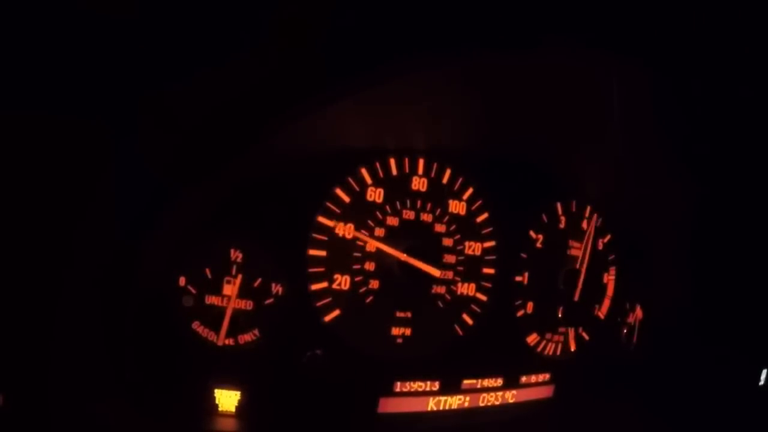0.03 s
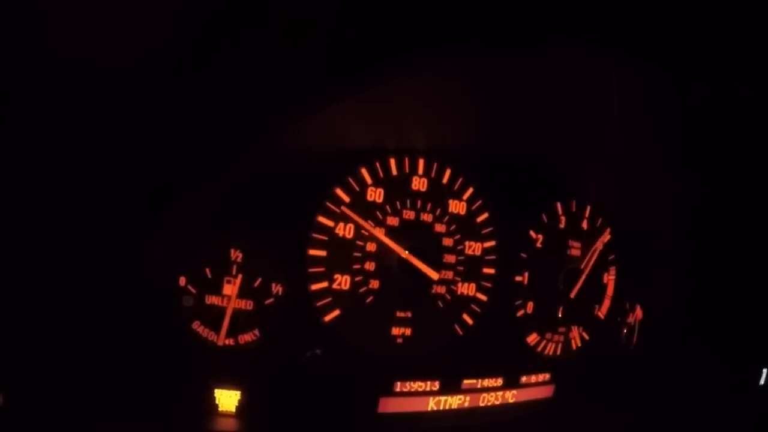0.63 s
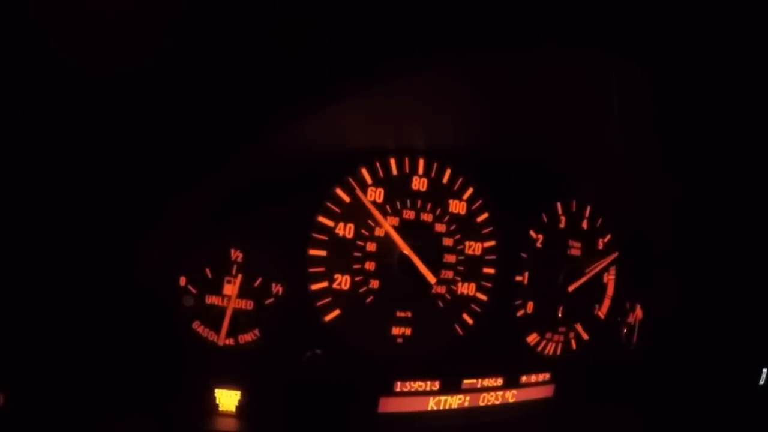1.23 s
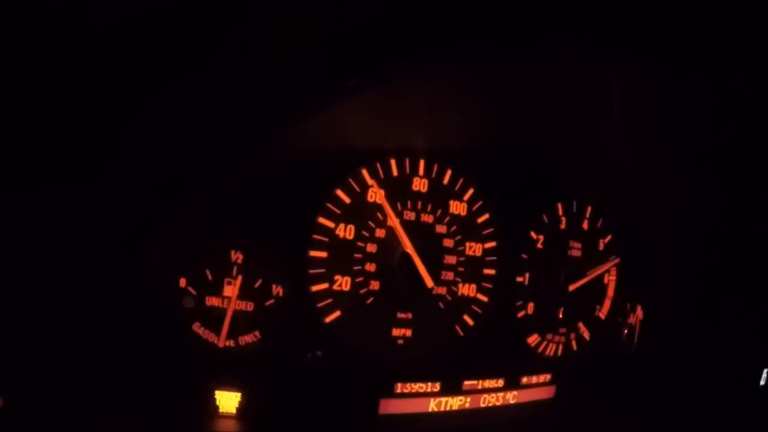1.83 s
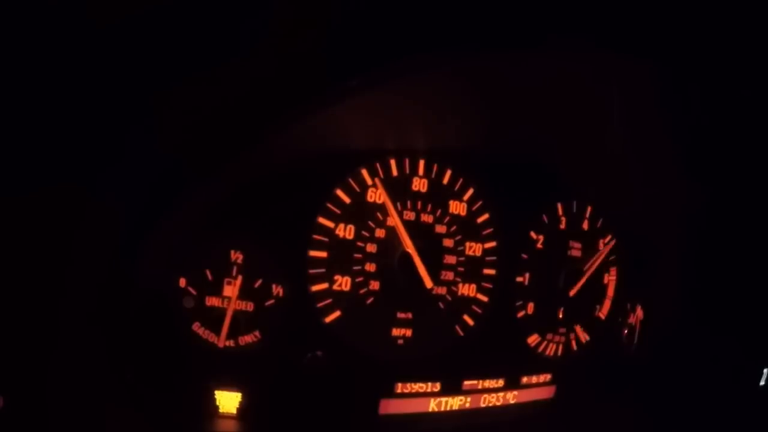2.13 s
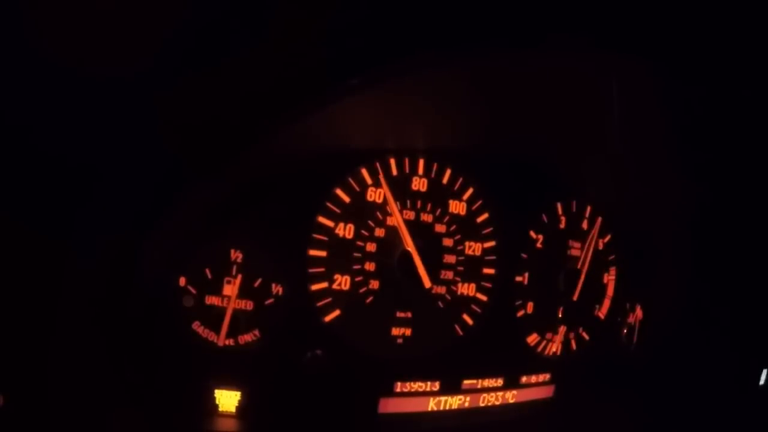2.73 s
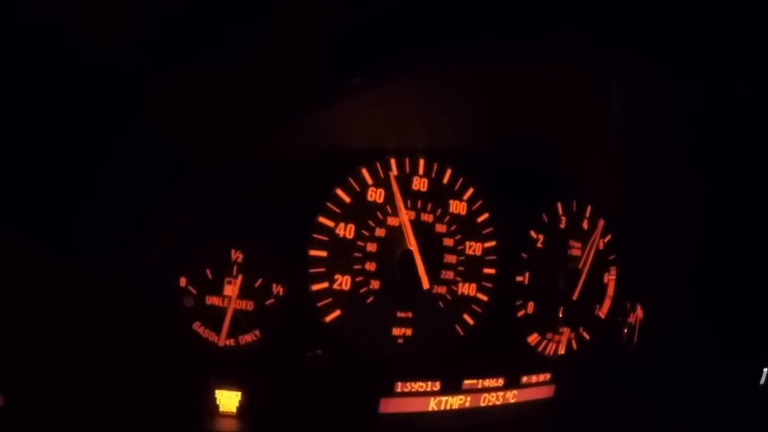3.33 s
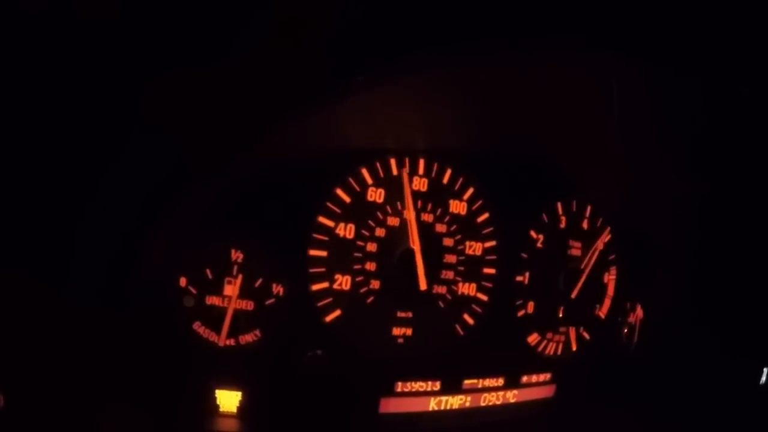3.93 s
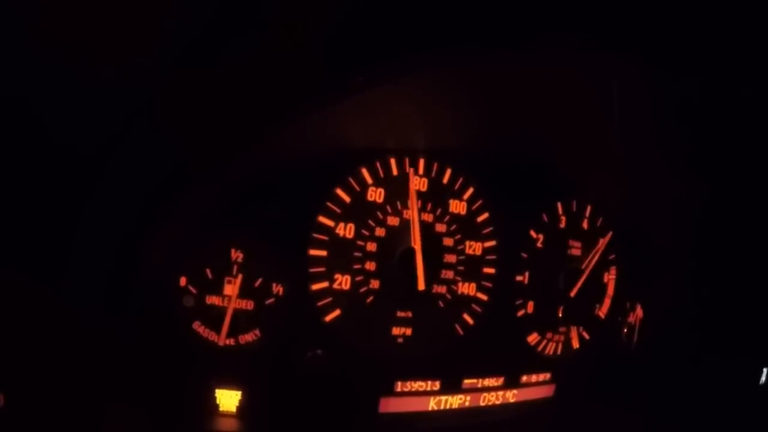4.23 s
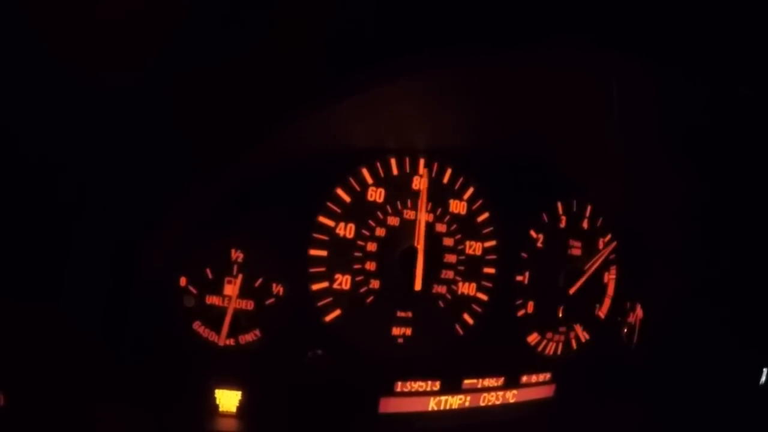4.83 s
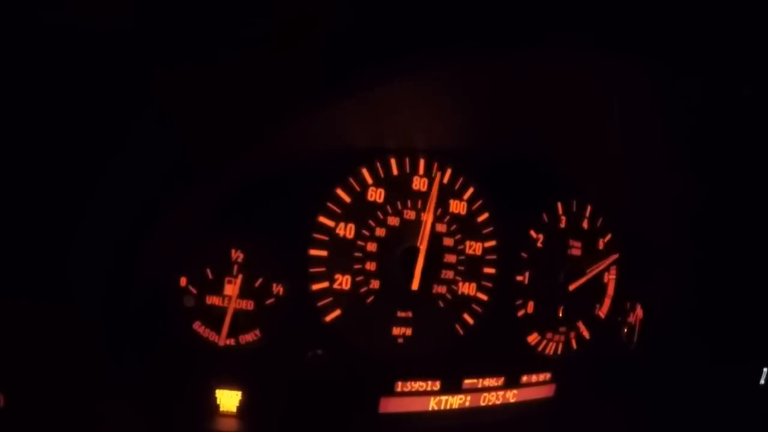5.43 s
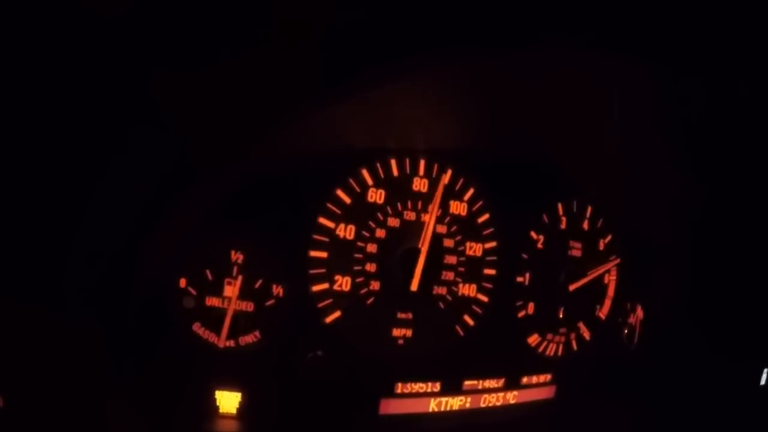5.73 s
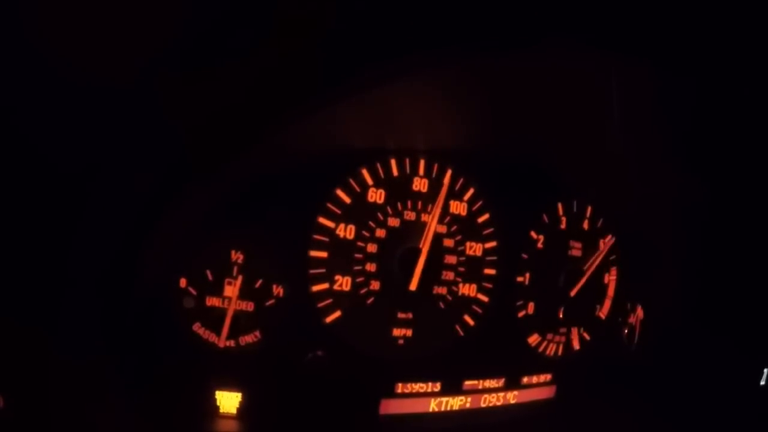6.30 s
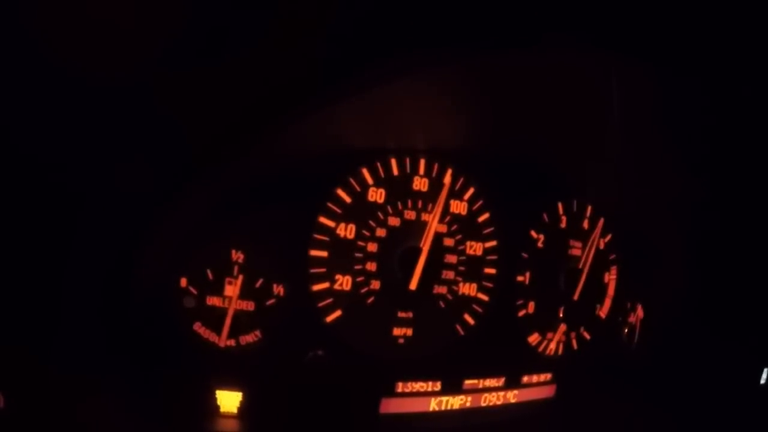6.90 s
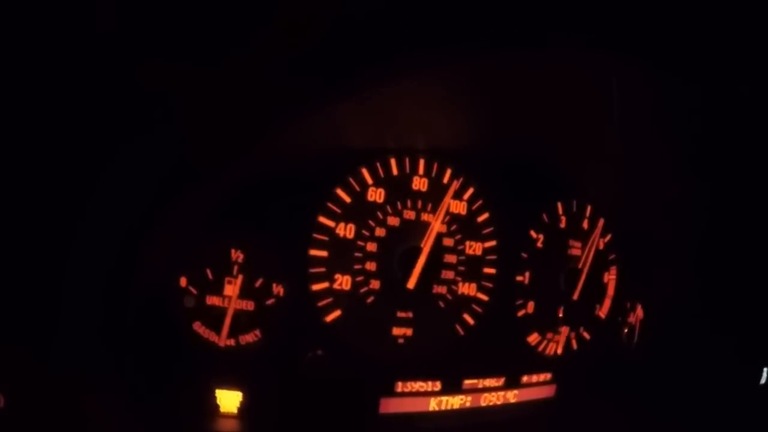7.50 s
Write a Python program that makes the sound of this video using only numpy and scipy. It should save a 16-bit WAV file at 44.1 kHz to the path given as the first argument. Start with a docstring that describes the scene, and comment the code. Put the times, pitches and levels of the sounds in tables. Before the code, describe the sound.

A supercharged V8 car engine is heard from the driver's seat, already accelerating hard. Its deep, booming roar rises in pitch, with an exhaust rasp and a faint intake hiss and whistle on top. At about 1.6 seconds the throttle shuts with a dull thud, and the engine goes quieter and falls in pitch for an upshift. Around 2.5 seconds another thud and small clack bring the power back, and the roar climbs slowly for three seconds. At about 5.7 seconds a knock marks a second, gentler shift and the revs sink again. From 6.7 seconds the engine pulls at half throttle, rising slightly until the end at about 7.5 seconds. Low tyre rumble and a deep cabin throb run throughout, while wind noise grows with speed. Loose dashboard trim ticks faintly, mostly after 5 seconds.

```python
"""Supercharged V8 from the driver's seat.

A hard pull through two upshifts. Crank orders boom in the cabin, firings chop the exhaust roar and rasp,
and the blower's intake hisses and whistles under load. Tyre rumble and wind follow road speed.
The cabin air throbs, trim ticks over bumps, and the driveline knocks as the load comes and goes."""
import sys
import numpy as np
from scipy import signal
from scipy.fft import rfft, irfft
from scipy.io import wavfile
from scipy.ndimage import uniform_filter1d

SR = 44100
rng = np.random.default_rng(int(sys.argv[2]) if len(sys.argv) > 2 else 0)


def store_pcm(level_fs):
    """Save levels as 16-bit WAV."""
    pcm = np.round(np.clip(level_fs, -1, 1) * 32767).astype(np.int16)
    wavfile.write(sys.argv[1], SR, np.atleast_2d(pcm).T)


N = 333396
TIME_S = np.arange(N) / SR
BINS_HZ = np.maximum(np.arange(N // 2 + 1) * SR / N, 1)


def undb(db):
    """Decibels to gain."""
    return 10 ** (np.asarray(db) / 20)


def unit(x):
    """Scale to rms 1."""
    return x / np.sqrt(np.mean(x ** 2))


def curve(points):
    """(time [s], value) points interpolated to every sample."""
    return np.interp(TIME_S, *np.transpose(points))


def noise():
    """White noise."""
    return rng.standard_normal(N)


def walk(rate_hz):
    """Smoothed random steps; rms 1."""
    hold = max(int(SR / rate_hz), 1)
    steps = np.repeat(rng.standard_normal(N // hold + 2), hold)[rng.integers(hold):][:N]
    return unit(uniform_filter1d(uniform_filter1d(steps, hold), hold))


def colour(x, points):
    """Filter by (frequency [Hz], gain [dB]) points; rms 1."""
    hz, db = np.transpose(points)
    gain = undb(np.interp(np.log(BINS_HZ), np.log(hz), db))
    return unit(irfft(rfft(x) * gain, N))


def resonate(x, hz, width_hz):
    """Two passes through one resonance; rms 1."""
    response = 1 / (1 + 1j * (BINS_HZ / hz - hz / BINS_HZ) * hz / width_hz)
    return unit(irfft(rfft(x) * response ** 2, N))


def above(x, corner_hz):
    """Zero-phase high-pass."""
    return irfft(rfft(x) / (1 + (corner_hz / BINS_HZ) ** 4), N)


def swell(hz, centre_hz, width_hz):
    """Gain of a resonance for a tone gliding through it."""
    return 1 / (1 + (2 * (hz - centre_hz) / width_hz) ** 2)


def fade(start_s, decay_s):
    """Sudden onset, exponential decay."""
    return (TIME_S > start_s) * np.exp(-np.clip((TIME_S - start_s) / decay_s, 0, 20))


def effort(shut, crank_hz, shut_loss_db, db_per_hz):
    """Gain that falls as the throttle shuts and climbs with revs; 1 flat out at 40 turns a second."""
    return undb(db_per_hz * (crank_hz - 40) - shut_loss_db * shut)


def puffs(turns, depth, lope):
    """Gas noise swelling at four firings a turn; uneven banks make it lope once a turn."""
    angle = 2 * np.pi * turns
    return noise() * np.exp(depth * np.cos(4 * angle) + lope * np.cos(angle))


def crank_tone(turns, order, waver_db, smear_rad):
    """One crank order; uneven combustion shakes its level and phase."""
    phase = 2 * np.pi * (order * turns + rng.random()) + smear_rad * walk(22)
    return np.sqrt(2) * undb(waver_db * walk(11)) * np.sin(phase)


def exhaust_rasp(turns, crank_hz, shut):
    """Bright gas noise, lightly chopped by the firings."""
    spectrum = [(700, -33), (1200, 5.5), (1700, 4), (2200, -1), (2650, 3.5), (3050, 5.5), (3500, -5.5),
                (4050, 3.5), (4500, -6), (5100, -0.5), (5700, -7.5), (6600, -5), (7600, -17), (12000, -26)]  # (frequency [Hz], gain [dB])
    rasp = colour(puffs(turns, depth=0.061, lope=0.052), spectrum) * undb(-39.5 + 0.5 * walk(45))
    return rasp * effort(shut, crank_hz, shut_loss_db=8, db_per_hz=0.52)


def cabin_boom(turns, crank_hz, shut):
    """Strong crank orders swell as they cross cabin resonances and die away off load."""
    # (order [per turn], open level [dB], shut loss [dB], loss exponent, waver [dB], smear [rad])
    orders = [(3, -17, 10.1, .9, 2.07, 0.28), (4, -19, 22, 2.25, 0.23, 0.062),
              (6, -24, 54, 1.44, 0.96, .15), (8, -19, 38, 1.99, .7, 0.065), (14, -34.5, 19, 1.4, 3.8, 0.31),
              (16, -26.5, 20.2, 0.99, 1.9, 0.16), (20, -41.5, 21, 1.6, 3.2, .4)]
    cabin_modes = [(117, 106, -1), (181.4, 88, -1.2), (242.5, 30, 6), (323.7, 53.4, 0.24), (487, 59, 0),
                   (558.5, 22, 4), (688, 150, 0.4), (1030, 110, 2)]  # (frequency [Hz], width [Hz], peak [dB])
    boom = 0
    for order, open_db, shut_loss_db, exponent, waver_db, smear_rad in orders:
        cabin_power = sum((undb(peak_db) * swell(order * crank_hz, hz, width_hz)) ** 2
                          for hz, width_hz, peak_db in cabin_modes)
        gain = undb(open_db - shut_loss_db * shut ** exponent) * np.sqrt(cabin_power)
        boom += gain * crank_tone(turns, order, waver_db, smear_rad)
    return boom


def exhaust_roar(turns, crank_hz, shut):
    """Gas puffs and, under load, weaker crank orders ring the pipes and body."""
    weak_orders = [(2, 6), (5, 6.5), (7, 4), (9, 2), (10, -2), (11, -15), (12, -0.5), (13, -7.5), (15, -14),
                   (18, -3), (22, -4.5), (24, -13), (26, -22), (28, -9), (30, -7.5)]  # (order [per turn], relative level [dB])
    body_response = [(90, -6), (180, -1.5), (260, -8.5), (400, -6.5), (500, -5.5), (620, 1.5), (710, -3.5),
                     (800, -5.5), (900, -9), (1030, -14.5), (1200, -11.5), (1700, -10)]  # (frequency [Hz], gain [dB])
    gas_spectrum = [(90, -54), (160, 10), (240, -4.5), (330, 0.5), (430, -0.5), (560, -0.5), (700, 1),
                    (810, -12), (1200, -15.5), (1700, -36), (3000, -46)]  # (frequency [Hz], gain [dB])
    unload = shut ** 2  # torque holds until the throttle is well closed
    uneven_turns = turns + 0.0036 * walk(110)  # firing jitter roughens high orders most
    tones = sum(undb(db) * crank_tone(uneven_turns, order, waver_db=3.5, smear_rad=0.34)
                for order, db in weak_orders)
    edge = colour(tones, body_response) * undb(-25 - 35 * unload)
    gas = colour(puffs(turns, depth=0.23, lope=0.39), gas_spectrum) * undb(-27 + 0.75 * walk(25))
    return (gas + edge) * effort(unload, crank_hz, shut_loss_db=7.26, db_per_hz=0.3)


def blower(turns, crank_hz, shut):
    """Belt-driven supercharger: intake hiss; under load, whine and whistles that fade as revs rise."""
    hiss_spectrum = [(2500, -15), (3600, -13), (4300, 6.5), (5200, 6.5), (6500, 1), (7600, -1.5),
                     (8600, -1), (9600, 1), (10600, 2.5), (11500, 4.5), (12300, -3.5), (13500, 6),
                     (14600, 1), (15700, -6)]  # (frequency [Hz], gain [dB])
    duct_modes = [(4150, 100, 3), (4923, 140, 3), (5910, 180, 0.5)]  # (frequency [Hz], width [Hz], relative level [dB])
    whine_order = 33
    hiss = colour(puffs(turns, depth=0.062, lope=0.049), hiss_spectrum)
    hiss -= (1 - undb(-27.5 * shut)) * above(hiss, 9500)  # top fades first on a lift
    whistle = unit(sum(undb(db + 2.7 * walk(16)) * resonate(noise(), hz, width_hz)
                       for hz, width_hz, db in duct_modes))
    whine = crank_tone(turns, whine_order, waver_db=3, smear_rad=0.3)
    whine *= swell(whine_order * crank_hz, centre_hz=1300, width_hz=170)
    singing = (whistle + undb(-2) * whine) * undb(-42 - 20 * shut - 0.6 * (crank_hz - 38))
    return (undb(-42.5) * hiss + singing) * effort(shut, crank_hz, shut_loss_db=8.5, db_per_hz=0.31)


def tyres(speed_mph):
    """Tyres drum; unevenly spaced tread blocks give a blurred tone that rises with speed."""
    spectrum = [(20, -4), (45, 2), (70, 3.5), (110, -1.5), (160, -10.5), (230, -9.5), (330, -18.5),
                (550, -18.5), (750, -27), (1000, -31.5), (1500, -42), (3000, -44), (7000, -79)]  # rumble (frequency [Hz], gain [dB])
    knee_mph, horn_mph, tread_hz_per_mph = 43, 65, 13.6
    rumble = colour(noise(), spectrum) * undb(-16 + 0.62 * walk(14))
    rumble /= 1 + (knee_mph / speed_mph) ** 4
    phase = 2 * np.pi * np.cumsum(tread_hz_per_mph * speed_mph) / SR
    tread = walk(230) * np.cos(phase) + walk(230) * np.sin(phase)
    tread *= undb(-40.5 - 0.4 * np.abs(speed_mph - horn_mph))  # peaks at the tyre-road horn resonance
    return rumble + tread


def wind(speed_mph):
    """Air gusts round pillars and mirrors; amplitude goes with speed cubed."""
    spectrum = [(100, -5), (190, 3), (310, 0.5), (420, -1), (600, -7), (800, -19), (1500, -32), (2300, -31),
                (2950, -24), (3600, -37), (7000, -68.5)]  # (frequency [Hz], gain [dB])
    return colour(noise(), spectrum) * (speed_mph / 90) ** 3 * undb(-25 + 1.7 * walk(9))


def cabin_throb():
    """Cabin air throbs at its lowest resonance and swells over bumps."""
    bumps = [(0.8, -21), (1.69, -21), (1.95, -13.5), (6.5, -17), (6.74, -16)]  # (time [s], level [dB])
    bump_s = 0.03
    throb = resonate(noise(), hz=26.7, width_hz=18.3)
    throb = unit(throb / np.sqrt(uniform_filter1d(throb ** 2, size=6000) + 0.11))  # evens the strength
    swells = sum(undb(db) * np.exp(-((TIME_S - at_s) / bump_s) ** 2) for at_s, db in bumps)
    return throb * (undb(-20 + 0.5 * walk(6)) + swells)


def trim_ticks():
    """Loose dashboard trim ticks over bumps."""
    ticks = [(0.818, -39), (5.060, -39), (5.570, -39), (5.900, -38), (6.040, -40), (6.278, -42),
             (6.768, -33.5), (7.143, -36.5)]  # (time [s], level [dB])
    envelope = sum(undb(db) * fade(at_s, decay_s=0.012) for at_s, db in ticks)
    return resonate(noise(), hz=2800, width_hz=810) * envelope


def driveline_knocks():
    """Driveline slack closes with a dull thud and a small clack."""
    knocks = [(1.584, 74, -2, -50), (2.536, 40.13, -3, -34.5), (5.719, 74, -3, -33), (6.765, 70, -27, -40)]  # (time [s], thud frequency [Hz], thud level [dB], clack level [dB])
    clack = resonate(noise(), hz=3100, width_hz=2300)
    sound = 0
    for at_s, thud_hz, thud_db, clack_db in knocks:
        thud = np.sin(2 * np.pi * thud_hz * (TIME_S - at_s))
        sound += undb(thud_db) * fade(at_s, decay_s=0.015) * thud
        sound += undb(clack_db) * fade(at_s, decay_s=0.0083) * clack
    return sound


def scene():
    """Revs and throttle drive the engine, speed drives tyres and wind; mono sum in the cabin."""
    revs = [(0.0, 36.3), (1.0, 46.56), (1.3, 49.82), (1.45, 51.37), (1.58, 50.2), (1.8, 43.55),
            (2.15, 36.55), (2.4, 33), (2.56, 35.58), (2.7, 34.73), (3.5, 38.35), (4.0, 40.82), (4.5, 42.82),
            (5.5, 47.57), (5.75, 47.48), (6.15, 40.18), (6.58, 34.97), (6.72, 35.89), (7.0, 35.4),
            (7.56, 37.36)]  # (time [s], crank speed [Hz])
    # flat out, full lift to shift, long pull, gentler shift, half throttle
    throttle = [(0, 0.85), (1.45, 0.8), (1.57, 0.75), (1.64, 0.03), (2.2, 0), (2.53, 0.34), (2.61, 0.87),
                (3.2, 0.72), (5.7, 0.53), (5.9, 0.22), (6.66, 0.32), (6.78, 0.52), (7.56, 0.55)]  # (time [s], opening [0-1])
    road_speed = [(0, 35.5), (1.6, 55), (2.6, 68.7), (5.8, 99.3), (6.7, 90), (7.56, 118)]  # (time [s], speed [mph])
    crank_hz, speed_mph = curve(revs), curve(road_speed)
    turns = np.cumsum(crank_hz) / SR
    shut = 1 - curve(throttle)
    engine = sum(part(turns, crank_hz, shut) for part in (exhaust_rasp, cabin_boom, exhaust_roar, blower))
    road = tyres(speed_mph) + wind(speed_mph) + cabin_throb()
    return (engine + road + trim_ticks() + driveline_knocks())[None]


def dip_treble(x, depth, width_s, corner_hz):
    """The treble dips briefly now and then."""
    dips = [0.170, 1.322, 2.600, 3.284, 3.753, 4.158, 5.288, 5.418, 5.610, 6.013, 6.826, 6.889, 6.954,
            7.250]  # (time [s])
    envelope = sum(np.exp(-((TIME_S - at_s) / width_s) ** 2) for at_s in dips)
    return x - depth * envelope * above(x, corner_hz)


def record(dry):
    """The treble dips, the microphone rounds the loudest peaks, and the top is cut off."""
    top_hz = 15700
    dipped = dip_treble(dry, depth=0.7, width_s=0.01, corner_hz=2920)
    rounded = 1.36 * np.tanh(dipped / 1.275)
    return signal.sosfilt(signal.ellip(10, 0.2, 80, top_hz, fs=SR, output="sos"), rounded)


dry = scene()
out = record(dry)
store_pcm(out)
```